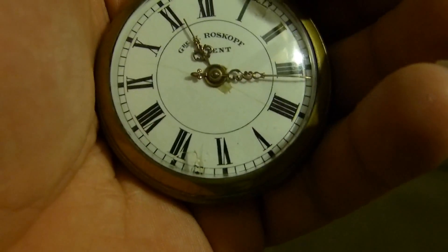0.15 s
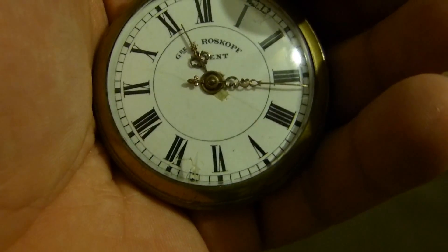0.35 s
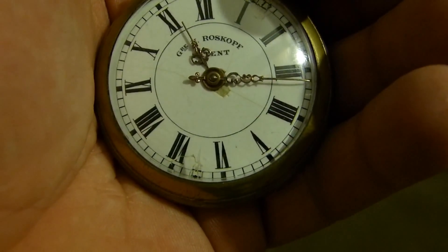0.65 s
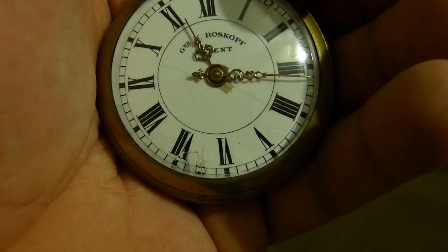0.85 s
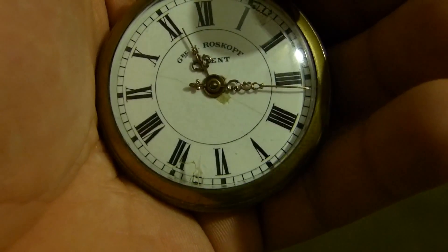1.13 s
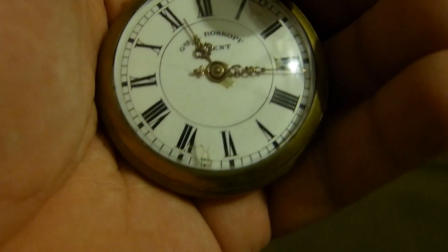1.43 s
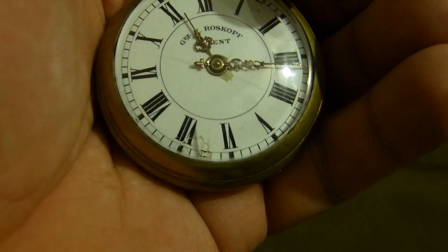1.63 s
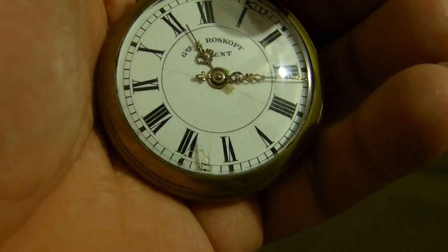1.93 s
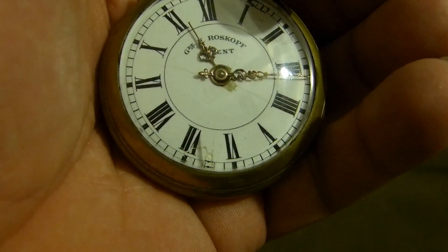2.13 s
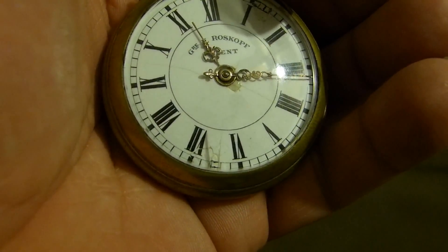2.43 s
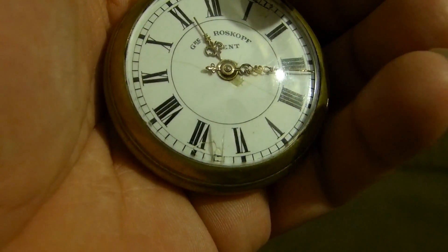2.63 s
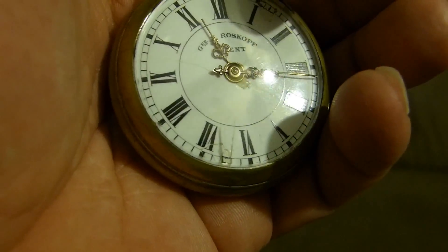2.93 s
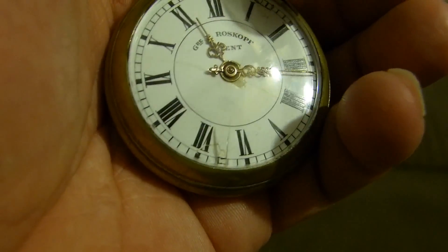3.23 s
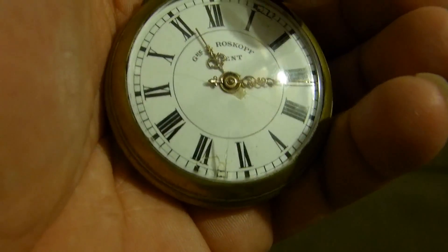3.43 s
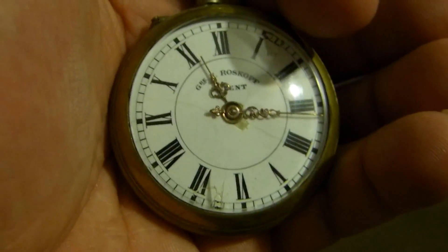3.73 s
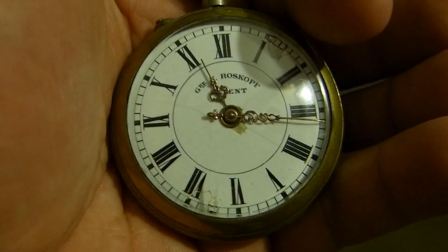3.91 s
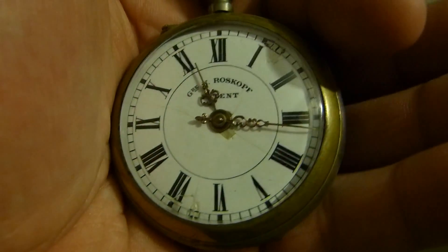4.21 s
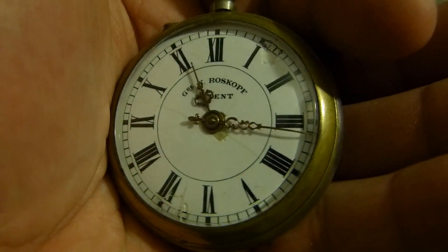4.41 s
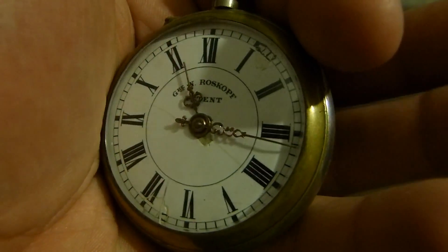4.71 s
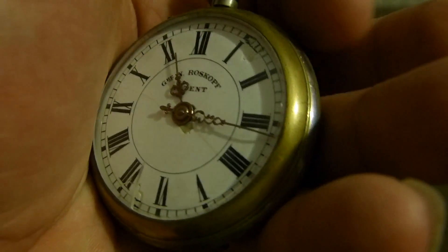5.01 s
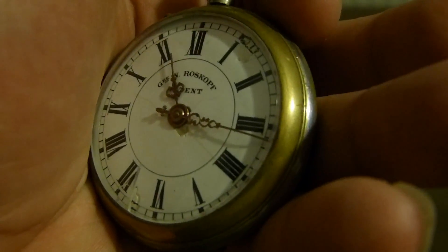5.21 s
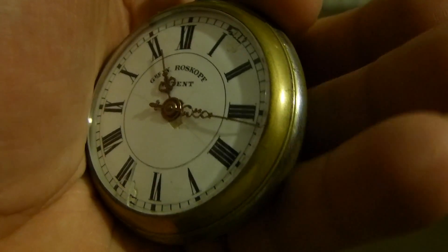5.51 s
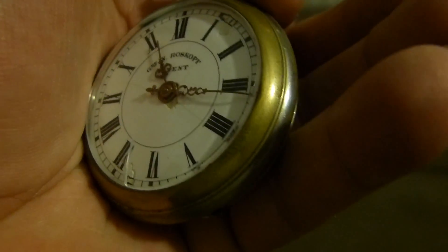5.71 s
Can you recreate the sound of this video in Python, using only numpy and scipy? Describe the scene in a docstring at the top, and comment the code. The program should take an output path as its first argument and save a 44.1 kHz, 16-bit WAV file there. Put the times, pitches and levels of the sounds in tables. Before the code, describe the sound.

A pocket watch's metal case gives one sharp click right at the start. The watch then ticks quickly and steadily, close to the microphone, about five beats a second, with tick and tock slightly different in tone. Each beat is thin, crisp and metallic, with a slight ring. Another watch and two clocks tick very faintly further off in a small quiet room with a soft hiss.

```python
"""A pocket watch in the hand

An old pin-lever pocket watch ticks close by, after one sharp click of its case. Each beat is three
tiny hits (unlocking, push, drop) that ring the same metal case; tick and tock take turns.
A small quiet room echoes, and a second watch and two clocks are faintly heard from further off."""
import sys
import numpy as np
from scipy import signal
from scipy.fft import rfft, irfft
from scipy.io import wavfile

SR = 44100
rng = np.random.default_rng(int(sys.argv[2]) if len(sys.argv) > 2 else 0)


def to_wav(sig):
    """Store sig (one row per channel, or 1-D mono) as 16-bit WAV at the path in sys.argv[1].

    Samples outside -1..1 are clipped; the rate is SR.
    """
    pcm = np.clip(np.atleast_2d(sig), -1, 1) * 32767
    pcm = np.round(pcm).astype(np.int16)
    wavfile.write(sys.argv[1], SR, pcm.T)  # frames by channels


N = 258426

# The tones at which the case and its works ring: (pitch [Hz], base time to fade by 60 dB [s],
# strength at unlocking tick [dB], tock [dB], at push tick [dB], tock [dB], at drop tick [dB], tock [dB],
# at case click [dB], left louder by [dB], left ahead by [rad])
CASE_TONES = [(1542, 0.017, -24, -12.5, -13, -16, -23, -20.5, -28, 3, 0.62),
              (2336, .014, -12, -5, -0.5, 0, -8, -13, -3.5, -0.5, 0.31),
              (2639, .014, -1, -9, -9, -1.5, 0.5, -6.5, 0.5, 0.5, 0.48),
              (2766, .012, 1, -0.5, -20, -2, 0, -2, -8, 2.5, 0.42),
              (3556, 0.0058, -28, -26, -24, -9, -13.5, -5.5, -12.5, 0, 0.43),
              (4732, 0.019, -10, -11, -5, -14, -4.5, -4, -15.5, -2.5, 0.46),
              (4813, 0.016, -16.5, -3, -15, -3.5, -8, -6, -10, -2.5, 0.41),
              (5566, 0.0072, -11, -20, -1, -3.5, -12.5, -14, -25, 4.5, -0.054),
              (6540, 0.0089, -16, -8.5, 3.5, -5.5, -24, -6, -16.5, -2.5, 0.17),
              (7215, 0.0053, -22, -11, -0.5, -13, -5.5, -7, -3.5, 2, -0.03),
              (7590, 0.01, -17, -16, -7, -20, -6, -3, -7, -1.5, -0.5),
              (8330, 0.0056, -17, -19, -22, -19, -13, -11, -25, -10, .3),
              (9010, 0.0097, -18, -23, -24, -14, -14, -12.5, -18, 2, 1),
              (10960, 0.016, -42, -37, -15.5, -37, -21, -20, -25.5, -3.5, 0.51),
              (12040, 0.012, -40, -36, -19, -35, -27, -24, -22.5, 2.5, 0.028),
              (14440, .005, -33, -34, -11, -29, -25, -19.5, -29, 3, 0)]
UNLOCK, PUSH, DROP, CASE = 2, 4, 6, 8  # where each kind of hit starts among those columns
# One full swing of the balance wheel gives a tick and then a tock.
SWING_S, FIRST_TICK_S, TOCK_AFTER_S = .41295, .1952, .2152
# The lever's two pins, tick then tock: (drop strength [dB], push earlier by [s], push strength [dB],
# unlocking earlier by [s], unlocking strength [dB])
PINS = [(-22.5, .006, -36, .0212, -34), (-27, .0079, -34, .0221, -37.5)]
# The sound drifts as the watch shifts in the hand:
# (time [s], extra drop level [dB], extra for middle tones [dB], upper tones [dB], top tones [dB])
HAND_DRIFT = [(0.2, 2.0, -3.5, -5.0, 0.5), (0.41, -0.5, -6.5, -1, 2), (1.24, 1.0, 4.5, -1.0, 4),
              (1.85, 1.5, -2, 6.5, -5), (2.06, -1.5, -1.5, 1, -2.0), (3.3, -1.5, -6.5, -6.0, -5.5),
              (3.71, 0.0, 2.0, 7, 0), (3.91, -0.0, 5.5, -5, 2), (4.13, -1, 5.0, 8.5, 2.5),
              (4.32, -1.5, 2, -1.5, -5), (4.95, 2.5, 6, 1.5, 4), (5.15, -0.5, 2.5, 4.5, 2),
              (5.37, 3.0, 4, 0, -1.5), (5.779, -3, 0, 6, 5)]
# The unlocking knock changes as the watch is tilted: (time [s], extra level [dB])
UNLOCK_DRIFT = [(.2, 1), (1.0, 1), (1.75, -4.5), (2.25, 2.5), (3.1, 3), (3.55, -4.5), (4.7, 1), (5.8, 0)]
# The click of the case: (time [s], level [dB])
CLICK = (.0364, -8.5)
# The noise in a small hit and in the case click: (frequency [Hz], relative level [dB])
CRACK = [(300, -55), (1200, -7.5), (2500, -5), (4000, -5), (7000, -4.5), (10000, -6), (15500, -33)]
CLICK_CRACK = [(300, -42), (600, -19), (950, 3.5), (1800, 4.5), (3500, -1.5), (7000, -8.5), (11000, -13),
               (15500, -35)]
# Long rings of the case shell: (centre pitch [Hz], time to fade by 60 dB [s], relative level [dB])
SHELL_RINGS = [(2574, 0.56, -15.5), (4750, 0.4, -13), (7640, .25, -17)]

# Timing of the second watch, the stepping clock and the pendulum clock: (first beat [s], gap [s])
FAINT_WATCH_TIMING = (.034, .2)
STEP_TIMING = (.173, 1)
PENDULUM_TIMING = (.148, .741)
# How hard each of them beats: (strong beat [dB], weak beat [dB])
FAINT_WATCH_DB = (-51, -56)
STEP_DB = (-45, -49.8)
PENDULUM_DB = (-46.5, -53)
# Their tone colours: (frequency [Hz], relative level [dB])
FAINT_WATCH_COLOUR = [(3000, -41), (5200, -18), (5950, 0), (6500, -15), (8500, -22), (12000, -40)]
STEP_COLOUR = [(150, -10.5), (400, -10), (650, -1), (950, -8.5), (1400, -6.5), (1720, 4), (2100, -18),
               (4000, -13.5), (10000, -32.5)]
PENDULUM_COLOUR = [(200, -15), (700, -9.5), (1400, 4.5), (2000, -5.5), (2700, -0.5), (4100, -9.5),
                   (7000, -10.5), (12000, -30)]
# Tone colours of the room's echo and of the steady hiss: (frequency [Hz], relative level [dB])
ECHO_COLOUR = [(300, 6), (1500, 4), (2600, -2.5), (4700, -3), (6000, 6), (7600, -4), (9000, 3), (11000, -5),
               (15500, -2)]
AIR_COLOUR = [(25, -3.5), (60, -7), (160, -6), (300, -8), (560, -10), (790, -9), (1000, -11.5), (1700, -12),
              (3500, -18), (4700, -15), (6000, -15), (9000, -16), (12000, -24.5), (15500, -32)]
# How wide the hiss sounds: (frequency [Hz], left-right difference over the shared part [dB])
AIR_WIDTH = [(50, -10), (110, -3.5), (200, 2.5), (380, 10), (700, 8.5), (1300, 5.5), (2400, 0), (4400, -3),
             (15000, -5.5)]


def watch(early_colour_share=.22, jitter_s=.0004, scatter_db=1):
    """The balance wheel unlocks the lever, a tooth pushes along one pin, then drops onto the other."""
    out, columns = np.zeros((2, N)), np.transpose(CASE_TONES)
    drift_at, *drift = np.transpose(HAND_DRIFT)
    for drop_at, pin in beats():  # the two pins ring the case differently
        drop_db, push_s, push_db, unlock_s, unlock_db = PINS[pin]
        level_db, middle_db, upper_db, top_db = (np.interp(drop_at, drift_at, row) for row in drift)
        colour = curve([(3000, 0), (4400, middle_db), (5100, middle_db),
                        (7000, upper_db), (7800, upper_db), (8500, top_db)], columns[0])
        unlock_at, push_at = drop_at - np.array([unlock_s, push_s]) + jitter_s * rng.standard_normal(2)
        unlock_db, push_db = np.array([unlock_db, push_db]) + scatter_db * rng.standard_normal(2)
        unlock_db += np.interp(drop_at, *np.transpose(UNLOCK_DRIFT))
        drop_db += level_db
        unlock_tones = columns[UNLOCK + pin] + early_colour_share * colour
        push_tones = columns[PUSH + pin] + early_colour_share * colour
        drop_tones = columns[DROP + pin] + colour
        unlock = hit(unlock_tones, CRACK, crack_db=-11.5, crack_t60=.035, swell_cycles=3.9, ring=.96)
        add(out, unlock_at, undb(unlock_db - 2) * unlock)
        grit_db = (-4, -14)[pin]  # one pin meets its tooth more roughly
        push = hit(push_tones, CRACK, grit_db, crack_t60=.047, swell_cycles=1.2, ring=1.42)
        add(out, push_at, undb(push_db - 1.1) * push)
        for share in rng.uniform(.37, .9, 2):  # the sliding tooth catches on its way
            scrape = hit(push_tones, CRACK, grit_db, crack_t60=.012, swell_cycles=4.6, ring=.78)
            add(out, push_at + share * (drop_at - push_at), undb(push_db - 11.5) * scrape)
        drop = hit(drop_tones, CRACK, top_db / 2 - 4.5, crack_t60=.012, swell_cycles=2.9, ring=.97)
        add(out, drop_at, undb(drop_db - 2) * drop)
        add(out, drop_at, undb(drop_db + top_db / 2) * gear_rustle())
    return out


def beats():
    """The time and pin (0 tick, 1 tock) of every drop."""
    ticks = np.arange(FIRST_TICK_S, N / SR, SWING_S)
    return [(at + pin * TOCK_AFTER_S, pin) for at in ticks for pin in (0, 1)]


def hit(tones_db, crack_colour, crack_db, crack_t60, swell_cycles, ring, detune=.012, scatter_db=1.9):
    """Metal meets metal: a crack, then the case tones swell and fade; `ring` stretches their fade."""
    t = seconds(.05)
    hz, t60, *_, pan_db, lead = np.transpose(CASE_TONES)[:, :, None]
    pitch_luck, level_luck = rng.standard_normal((2, len(CASE_TONES), 1))
    phase = 2 * np.pi * (hz * (1 + detune * pitch_luck) * t + rng.random(hz.shape))
    swell = 1 - np.exp(-(t * hz / swell_cycles) ** 2)
    size = undb(tones_db[:, None] + scatter_db * level_luck) * swell * fade(t, t60 * ring)
    tone = np.array([(size * undb(side * pan_db / 2) * np.sin(phase + side * lead / 2)).sum(0)
                     for side in (1, -1)])  # left, right
    tone /= np.sqrt(np.mean(tone[:, t < .004] ** 2))  # strength 1 over the first 4 ms
    attack = 1 - np.exp(-(t / .0008) ** 2)
    return tone + undb(crack_db) * noise(crack_colour, len(t)) * attack * fade(t, crack_t60)


def case_click():
    """One hard click rings the case longer than a tick does and sets the gears rattling."""
    out = np.zeros((2, N))
    at, db = CLICK
    click = hit(np.transpose(CASE_TONES)[CASE], CLICK_CRACK, crack_db=-4, crack_t60=.014,
                swell_cycles=1.8, ring=1.64, detune=.0026)
    add(out, at, undb(db) * click)
    add(out, at, undb(db) * gear_rustle())
    return out


def gear_rustle(relative_db=-32, t60=.23, grain_db=4):
    """The gear wheels move on and their teeth rustle unevenly."""
    t = seconds(.15)
    grain_at = np.linspace(0, t[-1], 75)
    grain = undb(grain_db * np.interp(t, grain_at, rng.standard_normal(len(grain_at))))
    return undb(relative_db) * noise(CRACK, len(t)) * grain * fade(t, t60)


def hairspring(hz=3170, spread_hz=840, db=-56, fall_db_per_s=3, lead_s=.068, length_s=.059):
    """The spring rings softly on the swing towards each tock, fainter as the watch is turned."""
    out, t = np.zeros((2, N)), seconds(length_s)
    band = [(hz - spread_hz, -40), (hz, 0), (hz + spread_hz, -40)]
    for at, pin in beats():
        if pin:
            add(out, at - lead_s, undb(db - fall_db_per_s * at) * noise(band, len(t)) * np.hanning(len(t)))
    return out


def shimmer(hz=8000, db=-56, fall_db_per_s=4, lead_s=.095, length_s=.1):
    """A high metallic shimmer swells ahead of every beat while the balance wheel swings."""
    out, t = np.zeros((2, N)), seconds(length_s)
    band = [(hz * .55, -25), (hz, 0), (hz * 1.3, -25)]
    for at, _ in beats():
        add(out, at - lead_s, undb(db - fall_db_per_s * at) * noise(band, len(t)) * np.hanning(len(t)))
    return out


def small_case(sound, low_hz):
    """A case this small sends out no bass."""
    return signal.sosfilt(signal.butter(4, low_hz, "high", fs=SR, output="sos"), sound)


def shell(sound):
    """A little of every hit lingers in the case shell, where close tones clash and flutter."""
    t, response = seconds(.6), 0
    for hz, t60, db in SHELL_RINGS:
        close_hz = hz * (1 + .013 * rng.standard_normal((10, 1)))
        ring = np.sin(2 * np.pi * close_hz * t).sum(0) * fade(t, t60)
        response += undb(db - 12.5) * ring / np.linalg.norm(ring) * np.sqrt(hz / SR)
    return signal.fftconvolve(sound, response[None], axes=1)[:, :N]


def room(sound, tail_db, tail_t60, early_db, early_t60=.062, wall_s=.0077, wall_db=-22):
    """A near wall, a bunch of early echoes and a soft tail, different on the left and right."""
    t, echoes = seconds(.7), []
    for channel in sound:
        response = 0
        for db, t60 in ((tail_db, tail_t60), (early_db, early_t60)):
            echo = noise(ECHO_COLOUR, len(t)) * fade(t, t60) * (t > .004)
            response += undb(db) * echo / np.linalg.norm(echo)
        response[int(wall_s * SR)] += undb(wall_db)
        echoes.append(signal.fftconvolve(channel, response)[:N])
    return np.array(echoes)


def faint_watch(early_s=.016, early_db=-5, t60=.06):
    """A second watch: a thin double tick that slides in and out of step with the first."""
    out, t = np.zeros((2, N)), seconds(.1)
    for at, db in steady_beats(FAINT_WATCH_TIMING, FAINT_WATCH_DB):
        for start, tick_db in ((at - early_s, db + early_db), (at, db)):
            add(out, start, undb(tick_db) * noise(FAINT_WATCH_COLOUR, len(t)) * fade(t, t60))
    return out


def far_clock(timing, levels_db, colour, rise_s, t60, width=.49):
    """A distant clock's ticks arrive as little more than their echo."""
    out, t = np.zeros((2, N)), seconds(.6)
    shape = (1 - np.exp(-t / rise_s)) * fade(t, t60)
    for at, db in steady_beats(timing, levels_db):
        shared, side = noise(colour, len(t)), width * noise(colour, len(t))
        add(out, at, undb(db) * np.array([shared + side, shared - side]) * shape)
    return out


def steady_beats(timing, levels_db):
    """Evenly spaced beats, strong and weak in turn: (time [s], level [dB])."""
    first, gap = timing
    return [(at, levels_db[k % 2]) for k, at in enumerate(np.arange(first, N / SR, gap))]


def air(shared_db=-56):
    """The steady hush of the room and microphone hiss, very wide in the low middle."""
    shared = noise(AIR_COLOUR, N)
    side = tint(noise(AIR_COLOUR, N), AIR_WIDTH)
    return undb(shared_db) * np.array([shared + side, shared - side])


def undb(db):
    """Turn decibels into a number to multiply by."""
    return 10 ** (np.asarray(db) / 20)


def fade(t, t60):
    """A natural fade that is 60 dB down after t60 seconds."""
    return np.exp(-np.log(1000) * t / t60)


def seconds(length):
    """The time of each sample in a short sound."""
    return np.arange(int(length * SR)) / SR


def curve(points, hz):
    """Read the level at hz from a line through (frequency [Hz], level [dB]) points."""
    at, db = np.transpose(points)
    return np.interp(np.log(hz + 1), np.log(at), db)


def tint(sound, colour):
    """Turn each frequency up or down to follow a tone colour."""
    hz = np.fft.rfftfreq(len(sound), 1 / SR)
    return irfft(rfft(sound) * undb(curve(colour, hz)), len(sound))


def noise(colour, size):
    """Noise of the given tone colour, with strength 1."""
    hiss = tint(rng.standard_normal(size), colour)
    return hiss / np.std(hiss)


def add(out, start, sound):
    """Mix a sound in at a time in seconds."""
    i = max(int(start * SR), 0)
    part = sound[..., :max(N - i, 0)]
    out[:, i:i + part.shape[-1]] += part


def scene():
    """The watch in its room, with the other timepieces and the hiss behind it."""
    ticking = small_case(watch() + hairspring() + shimmer(), low_hz=940)
    click = small_case(case_click(), low_hz=725)
    other_watch = faint_watch()
    step_clock = far_clock(STEP_TIMING, STEP_DB, STEP_COLOUR, rise_s=.006, t60=.51)
    pendulum = far_clock(PENDULUM_TIMING, PENDULUM_DB, PENDULUM_COLOUR, rise_s=.0047, t60=.49)
    echoes = room(ticking + other_watch, tail_db=-13, tail_t60=.19, early_db=-15)
    echoes += room(click, tail_db=-16.5, tail_t60=.43, early_db=-14.5)
    near = ticking + click
    return near + shell(near) + echoes + other_watch + step_clock + pendulum + air()


def record(dry, top_hz=15900):
    """Round off the loudest peak and cut the highest treble."""
    return signal.sosfilt(signal.ellip(10, .2, 70, top_hz, fs=SR, output="sos"), np.tanh(dry))


dry = scene()
out = record(dry)
to_wav(out)
```